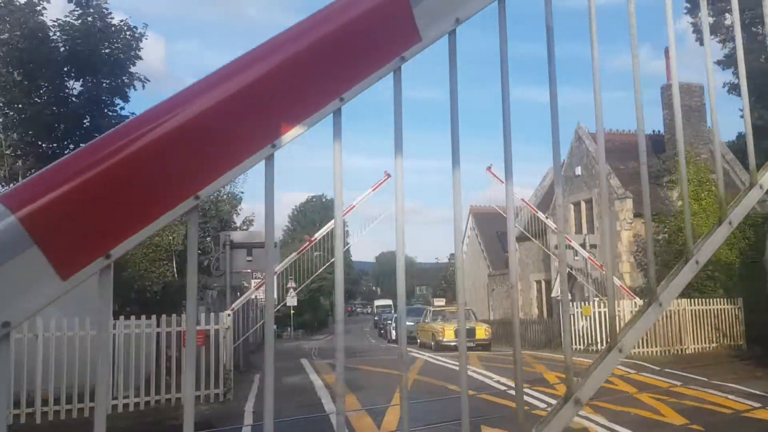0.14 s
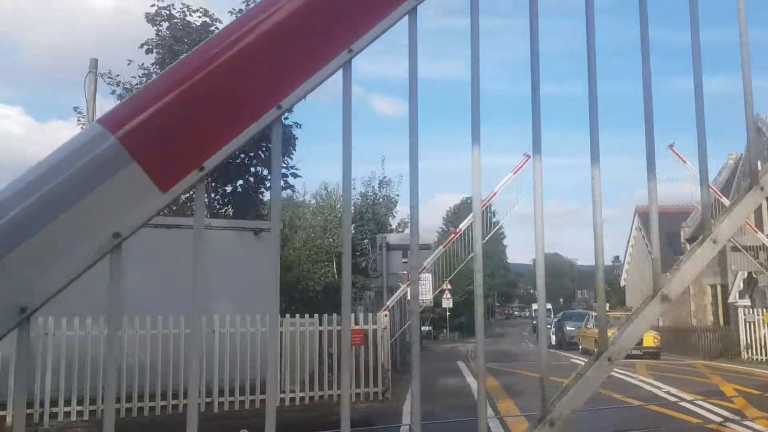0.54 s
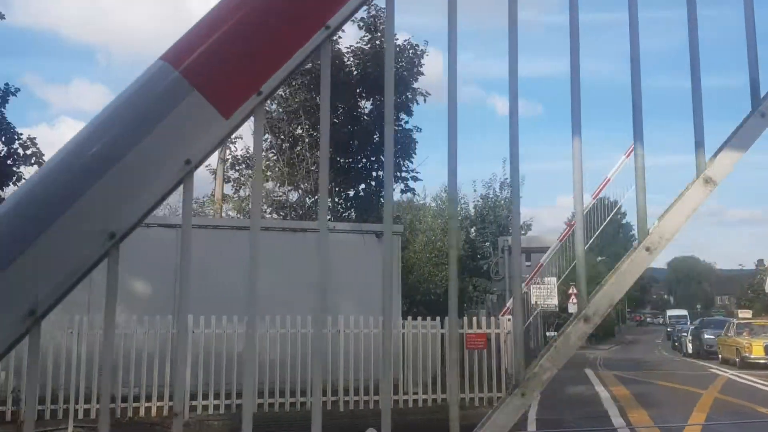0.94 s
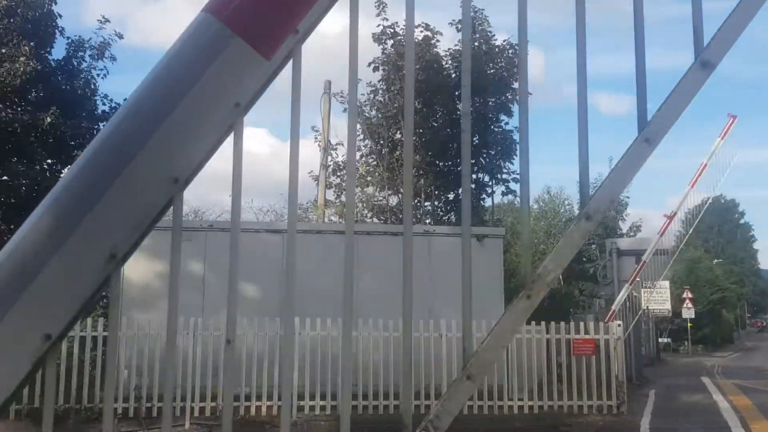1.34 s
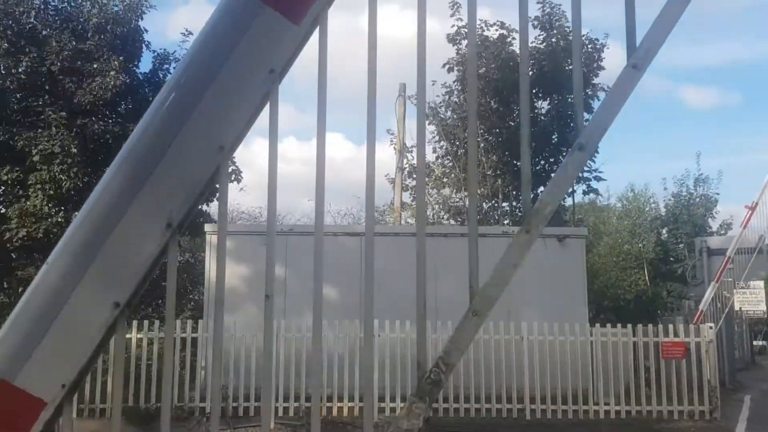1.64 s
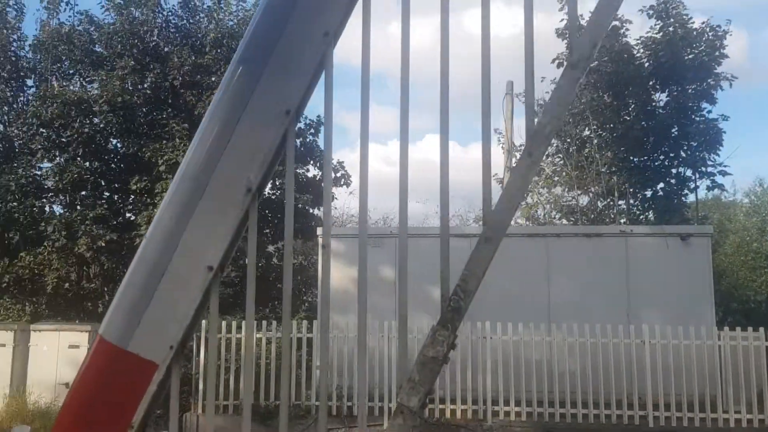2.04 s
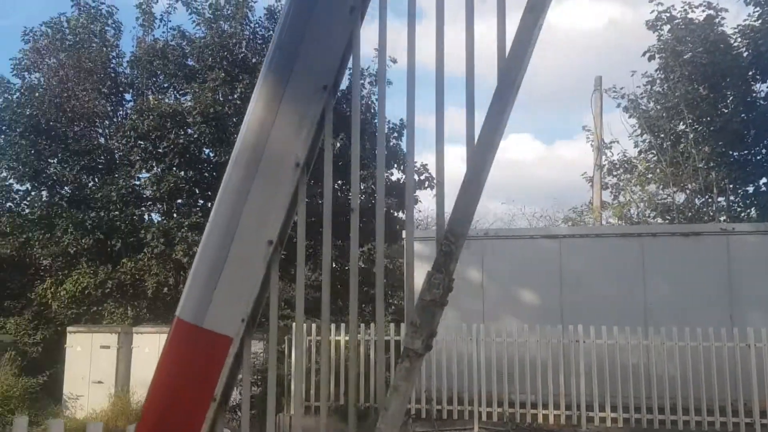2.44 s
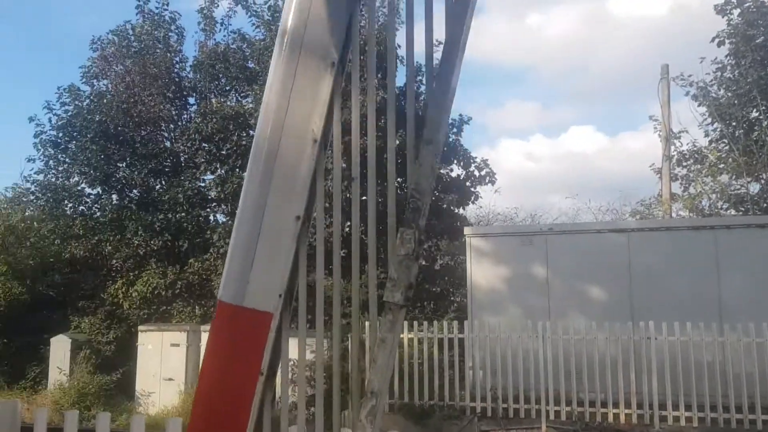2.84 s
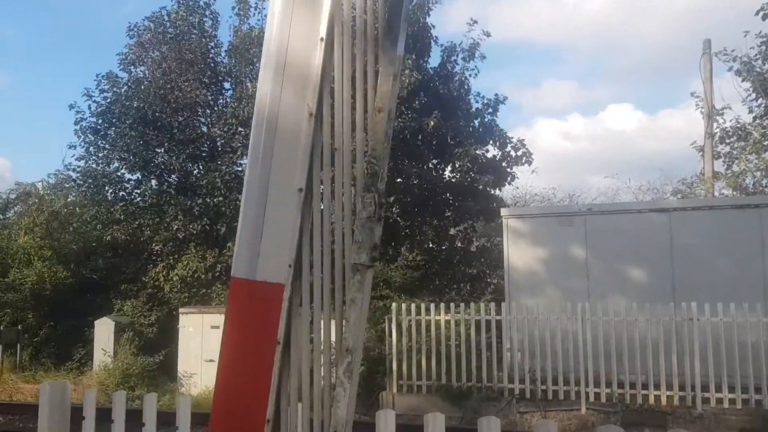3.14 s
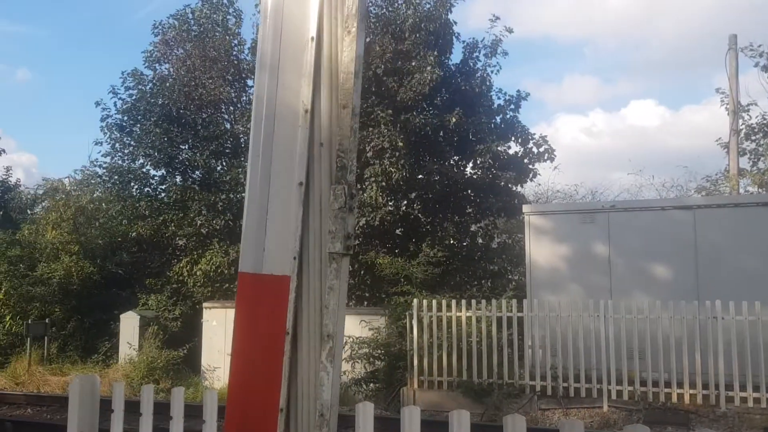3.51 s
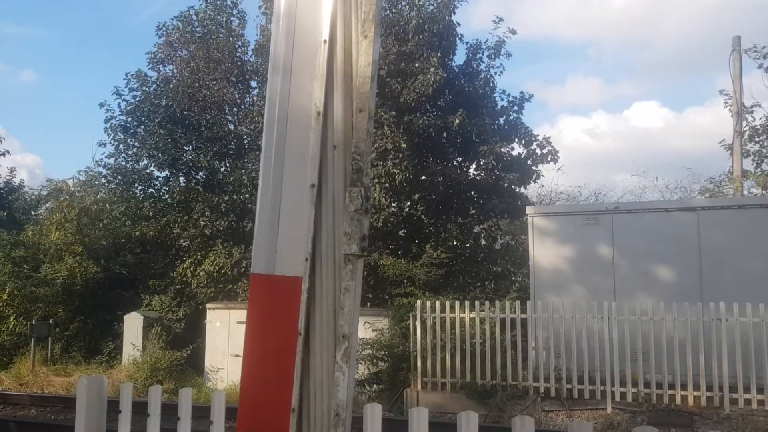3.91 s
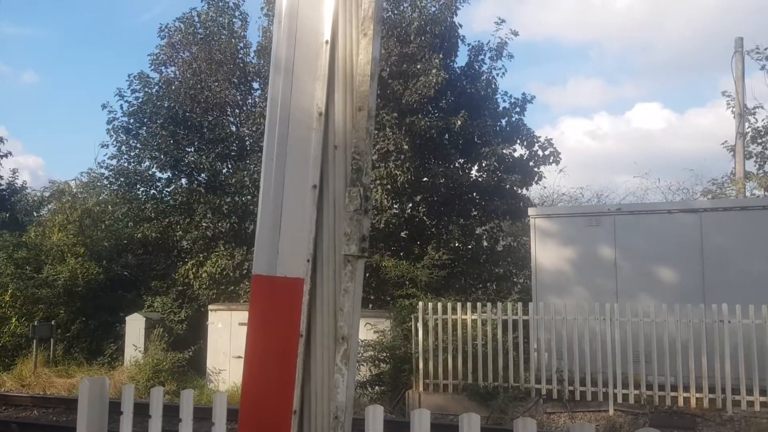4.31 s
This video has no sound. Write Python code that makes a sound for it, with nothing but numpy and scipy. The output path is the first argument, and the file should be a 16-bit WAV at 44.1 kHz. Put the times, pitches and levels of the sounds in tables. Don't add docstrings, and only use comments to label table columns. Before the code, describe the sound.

A level crossing barrier's pump hums steadily as the boom rises, then slams and clatters to a stop while cars pull away loudly.

```python
import sys
import numpy as np
from scipy import signal
from scipy.fft import rfft, irfft, next_fast_len
from scipy.io import wavfile
from scipy.ndimage import uniform_filter1d

SR = 44100
rng = np.random.default_rng(int(sys.argv[2]) if len(sys.argv) > 2 else 0)


def volts(x):
    e = np.asarray(x, float) / 20
    return 10 ** e


def to_wav(s):
    ch = np.atleast_2d(s).T
    pcm = np.round(np.clip(ch, -1, 1) * 32767)
    wavfile.write(sys.argv[1], SR, pcm.astype(np.int16))


N = 197068

# time_s, gain_db
ROAD_GAIN = [(0, 3), (.6, 0.5), (.85, 2.5), (1.4, 5.5), (1.9, 6), (2.6, 8.5), (3.0, 14), (3.25, 12),
             (3.42, 14.5), (3.55, 11), (3.75, 13.5), (4.47, 15.5)]
ROAD_LAYER_HZ = [45, 500, 4000, 12000]
# far_level_db, share_of_gain
ROAD_LAYERS = [
    (-54, 1.007),
    (-56.5, 0.92),
    (-73.5, 1.244),
    (-75.5, 0.39),
]
# freq_hz, level_db
ROAD_COLOUR = [(25, -9.5), (70, 0.5), (130, -4), (280, 1.5), (520, -10.5), (800, -1.5), (1050, -5.5),
               (1400, -6), (2100, 5), (3300, -0.5), (5200, -2), (7000, 2), (10000, -3), (14000, -1)]
# freq_hz, power_share
ROAD_COMMON = [(40, 0.9), (300, 0.72), (800, 0.67), (3000, 0.057), (12000, .2)]
# vane_rate_hz, sag_hz_per_s
FAR_PUMP_HZ = [(328.2, 2.6), (352, 2.85)]
# level_db, drift_db_per_s, last_swell_db, swell_s, swell_width_s
FAR_PUMPS = [(-46, -3.5, 11.5, 3.0, 0.25), (-55.5, 0, 16, 2.7, 0.5)]
# time_s, cycle_rate_hz, effort_db
CAR = [(0.0, 20.63, -53), (0.5, 20.76, -45), (1.0, 20.76, -41), (1.3, 20.65, -41.5), (1.46, 21.2, -40.5),
       (1.59, 24.84, -42), (1.69, 28.35, -40), (2.01, 29.62, -44), (2.2, 31.6, -44.5), (2.57, 35.51, -43),
       (2.8, 38.2, -57.5)]
# order, level_db re effort off resonance
CAR_ORDERS = [(4, -1), (6, -10.5), (8, -16.5), (10, -20), (14, -24)]
# order, level_db re effort
CAR_WEAK = [(2, -7.5), (3, -5.5), (5, -12.5), (9, -11)]
# freq_hz, width_hz, lift_db
CAR_PIPE = [(203.8, 28.3, 18.5), (294, 22, 8)]
# time_s, shaft_rate_hz, effort_db
VAN = [(1.9, 37.92, -46.5), (2.04, 37.4, -37.5), (2.23, 35.69, -40.5), (2.42, 35.54, -54),
       (2.49, 34.93, -37), (2.59, 35.69, -44.5), (2.7, 37.16, -32.5), (2.9, 40.92, -34.5),
       (3.06, 39.03, -34), (3.26, 36.23, -44), (3.6, 40.69, -34.5), (3.72, 41.52, -34.5),
       (3.8, 41.92, -25.5), (3.9, 43.95, -29), (3.97, 44.87, -28), (4.14, 48.76, -22), (4.26, 48.43, -25.5),
       (4.47, 50.05, -23)]
# order, level_db re order 2
VAN_ORDERS = [(3, -22.5), (4, -12), (6, -17)]
# order, level_db re order 2
VAN_WEAK = [(1, -38), (5, -23), (8, -18.5), (10, -35), (12, -35)]
# freq_hz, width_hz, lift_db
VAN_PIPE = [(112.4, 8.7, 15), (191, 15, 2.5)]
# start_s, end_s, reference_rate_hz, level_db
KNOCK = [
    (1.45, 3.048, 30.3, -53.5),
    (2.994, 4.479, 46, -45),
]
# freq_hz, width_hz, level_db
BLOCKS = [
    [(1060, 110, 2), (1670, 350, -1), (2080, 150, -1.5), (2720, 250, -2.5), (3280, 200, -2),
     (3810, 130, -3), (4470, 250, -6.5)],
    [(1060, 320, 7.5), (1647, 250, 7), (2240, 260, 3), (2630, 260, -7), (3300, 270, -4.5),
     (4400, 130, -13.5), (4850, 230, -46)],
]
# start_s, bright_db, body_db, t60_s, rise_s
RAILS = [(1.359, -54, -42, 0.1, 0.0042), (2.612, -50.5, -41.5, 0.14, 0.0054),
         (3.606, -39, -33, 0.18, 0.012), (3.65, -44.5, -46.5, .2, .006),
         (3.706, -45.5, -37.5, 0.18, 0.0045), (3.734, -58.5, -50, 0.13, 0.0049),
         (4.142, -37, -37, 0.15, 0.011), (4.221, -46, -48.5, .15, 0.0029), (4.229, -44, -51.5, .3, 0.0034),
         (4.336, -38.5, -43.5, 0.12, .01), (4.445, -41.5, -57, .05, .003)]
# time_s, rate_hz
PUMP_HZ = [(0, 359.6), (.5, 358.6), (1.3, 357.4), (1.6, 358), (2.0, 357.9), (2.85, 356.5), (3.1, 364.5),
           (3.3, 365)]
# time_s, level_db
PUMP_FIRST = [(0, -31), (.6, -32), (1.2, -32.5), (1.7, -29.5), (2.25, -33), (2.5, -36.5), (2.8, -37.5),
              (2.92, -36.5), (3.0, -29.5), (3.28, -29.5)]
# multiple, level_db re second
PUMP_UPPER = [(3, -28), (4, -23), (5, -26), (7, -31), (8, -24), (10, -32), (12, -33), (13, -32), (15, -35),
              (19, -34)]
# start_s, length_s, pitch_hz, level_db
SQUEAKS = [(0.045, 0.055, 2315, -54), (0.085, 0.054, 2240, -59.5), (0.176, 0.048, 2310, -53),
           (0.207, 0.043, 2250, -45), (2.894, 0.026, 2168, -40.5)]
# start_s, pitch_hz, level_db, t60_s
CLINKS = [(1.076, 4800, -50.5, .04), (2.2592, 6140, -33, .03), (2.26, 5340, -55, 0.083),
          (2.262, 1710, -45, 0.12), (2.616, 6450, -39, .05), (2.846, 1060, -32.5, 0.092),
          (3.297, 4400, -41, 0.06), (3.345, 2106, -25, 0.13), (3.346, 2270, -24, .12),
          (3.356, 5160, -45, 0.094), (3.359, 2104, -19, 0.056), (3.36, 2200, -29, 0.13),
          (3.359, 1300, -30, 0.093), (3.917, 2070, -31.5, 0.11), (3.923, 2210, -37, 0.076),
          (3.48, 1810, -34, 0.082), (3.617, 6200, -42, .06), (3.71, 4800, -38, 0.03),
          (3.734, 1770, -39, 0.1), (4.149, 5940, -35, 0.037)]
# start_s, bright_db, ring_db, t60_s, rise_s
BARS = [(1.075, -61, -55.5, 0.089, 0.0031), (2.2607, -40, -54, 0.058, 0.0013),
        (2.269, -51, -42.5, 0.09, 0.0034), (2.999, -62.5, -53, .1, 0.0043), (3.062, -50.5, -49, .1, 0.0071),
        (3.107, -49, -43.5, 0.16, 0.011), (3.229, -50.5, -53.5, 0.092, 0.0035),
        (3.294, -37, -48, 0.064, 0.00079), (3.343, -36, -27, 0.16, 0.0065),
        (3.3565, -26.5, -16.5, 0.077, 0.0012), (3.356, -33, -20, 0.11, .002),
        (3.378, -42.5, -32, 0.13, .003), (3.42, -52, -42.5, 0.066, 0.0069),
        (3.474, -56.5, -32, 0.078, .002), (3.88, -54.5, -42.5, .08, 0.0025),
        (3.897, -44.5, -43.5, 0.12, 0.0042), (3.915, -47.5, -29, 0.08, 0.011),
        (3.931, -39, -48.5, 0.071, 0.002)]
# freq_hz, width_hz, level_db
BAR_MODES = [(1270, 40, -5), (1490, 40, -8), (1816, 30, -2), (2106, 30, 2), (2202, 30, 1), (2456, 40, -4),
             (2790, 150, -11), (3150, 200, -10), (2000, 1500, -13), (4200, 600, -11), (5100, 700, -11)]
# start_s, level_db, t60_s, rise_s
STOP = [
    (3.341, -23.5, 0.13, 0.0037),
    (3.354, -20, 0.22, 0.0027),
    (3.375, -25.5, 0.2, 0.0033),
    (3.41, -32.5, 0.38, 0.0046),
]
# freq_hz, width_hz, level_db
CABINET = [(286, 26, 8.5), (350, 27, -1), (385, 11, 6.5), (411, 16, 10), (481, 8.2, 8), (600, 69, -4.5),
           (796, 28, -5), (870, 25, -8.5), (1296, 490, -11)]
# start_s, level_db, t60_s, rise_s
VALVE = [
    (3.282, -18.5, 0.079, 0.0056),
    (3.293, -25, 0.18, .003),
]
# freq_hz, width_hz, level_db
VALVE_MODES = [(408, 19, 11.5), (507, 41, 5), (610, 66, 1.5), (745, 32, 2.5), (1140, 420, -6.5),
               (2360, 2700, -28.5)]
# freq_hz, gain_db
MICROPHONE = [(20, -18), (45, 1.5), (5300, 0), (6300, -7), (7100, -9.5), (8600, -17), (9600, -8.5),
              (10500, -4.5), (12500, 0.5), (15300, -0.5)]

BARRIER_LAG, ROAD_LAG = -3, 16


def level(x):
    return x / np.sqrt(np.mean(x ** 2))


def noise():
    return rng.standard_normal(N)


def curves(table):
    s, *columns = np.transpose(table)
    t = np.arange(N) / SR
    fade_in = t - s[0] + .03 * (s[0] == 0)
    gate = np.clip(np.minimum(fade_in, s[-1] + .02 - t) / .03, 0, 1)
    return [np.interp(t, s, c) for c in columns], gate


def along(table, hz):
    points = np.array(table)
    return np.interp(np.log(hz), np.log(points[:, 0]), points[:, 1])


def bump(s, width_s):
    return np.exp(-((np.arange(N) / SR - s) / width_s) ** 2)


def walk(rate_hz):
    k = int(SR / rate_hz)
    held = np.repeat(rng.standard_normal(N // k + 1).astype(np.float32), k)
    return 1.072 * uniform_filter1d(uniform_filter1d(held, k), k)[:N]


def band(x, hz, width_hz):
    return signal.lfilter(*signal.iirpeak(hz, hz / width_hz, fs=SR), x)


def double_band(x, hz, width_hz):
    return level(band(band(x, hz, width_hz), hz, width_hz))


def body(x, modes):
    gain = np.sqrt(sum(volts(2 * db) * width for _, width, db in modes) * np.pi / SR)
    ringing = sum((-1) ** k * volts(db) * band(x, hz, width) for k, (hz, width, db) in enumerate(modes))
    return ringing / gain


def ports(x, lag, pan_db):
    lag = round(lag)
    left = np.roll(x, max(lag, 0)) * volts(pan_db / 2)
    right = np.roll(x, max(-lag, 0)) * volts(-pan_db / 2)
    return np.array([left, right])


def tilt(db):
    return volts(np.array([[db], [-db]]))


def stack(hz, orders, wobble, flutter_db, rate_hz):
    turn = 2 * np.pi * np.cumsum(hz * (1 + wobble * walk(rate_hz))) / SR
    out = np.zeros(N)
    for k, db in orders:
        gain = np.sqrt(2) * volts(db + flutter_db * walk(rate_hz))
        out += gain * np.sin(k * turn + rng.uniform(0, 2 * np.pi))
    return out


def bursts(times, dbs, t60s, rises, grain_db):
    power = np.zeros(N)
    for s, db, t60, rise in zip(times, dbs, t60s, rises):
        start, t60 = int(s * SR), max(t60, .01)
        t = np.arange(min(N - start, int((abs(rise) + t60) * SR))) / SR
        swell = np.clip(t / max(rise, 1e-4), 0, 1) ** 2
        power[start:start + len(t)] += volts(2 * db) * swell * volts(-120 * np.maximum(t - rise, 0) / t60)
    return np.sqrt(power) * level(noise() * volts(grain_db * walk(700)))


def crack(s, db, t60, rise):
    shower = [bursts(s, db, .6 * t60, rise, grain_db=4.5) for _ in range(3)]
    treble = signal.butter(2, [4000, 14000], "band", fs=SR, output="sos")
    return signal.sosfilt(treble, shower)


def road():
    (near_db,), _ = curves(ROAD_GAIN)
    dbs = [far_db + share * near_db for far_db, share in ROAD_LAYERS]
    out, swell = np.zeros((2, N)), walk(3.014)
    for hz in 25 * 2 ** np.arange(0, 9.4, 1 / 3):
        place = np.interp(np.log(hz), np.log(ROAD_LAYER_HZ), np.arange(4))
        low = min(int(place), 2)
        db = dbs[low] + (place - low) * (dbs[low + 1] - dbs[low])
        db = db + along(ROAD_COLOUR, hz) + 2.0 * swell + 1.6 * walk(9)
        share = np.clip(along(ROAD_COMMON, hz), 0, 1)
        common = level(band(noise(), hz, hz / 4))
        apart = np.array([np.roll(common, N // 3), np.roll(common, -N // 3)])
        together = ports(common, ROAD_LAG if hz > 900 else 4, 0)
        pair = np.sqrt(share) * together + np.sqrt(1 - share) * apart
        out += volts(db) * pair * tilt(.4)
    return out


def far_pumps():
    stop_s = 3.3
    (t,), gate = curves([(0, 0), (stop_s, stop_s)])
    out = np.zeros((2, N))
    for (hz, sag), (db, drift, swell_db, s, width) in zip(FAR_PUMP_HZ, FAR_PUMPS):
        db = db + drift * t + swell_db * bump(s, width)
        tone = stack(hz - sag * t, [(1, db), (2, db - 10.5)], wobble=0.00033, flutter_db=2.0, rate_hz=15)
        out += ports(gate * tone, 11, 0.54)
    return out


def pipe_orders(orders, hz, effort_db, pipe):
    lifted = []
    for k, db in orders:
        lift = sum(lift_db * np.exp(-((k * hz - at_hz) / width) ** 2) for at_hz, width, lift_db in pipe)
        lifted.append((k, effort_db + db + lift))
    return lifted


def knock(rate_hz, firings, row, block, scatter_db):
    start, end, at_hz, db = row
    _, gate = curves([(start, 0), (end, 0)])
    db = db + 14.5 * np.log2(rate_hz / at_hz)
    db = db + 1.5 * walk(14) + 5.5 * bump(1.93, 0.29)
    firing = np.cumsum(firings * rate_hz / SR)
    strength = volts(scatter_db * np.clip(rng.standard_normal(700), -3, 1.5))[firing.astype(int)]
    blows = strength * np.exp(-(firing % 1) / 0.44) * noise()
    ringing = np.zeros(N)
    for hz, width, panel_db in block:
        ringing += volts(panel_db + 2.2 * walk(15)) * double_band(blows, hz, width)
    return gate * volts(db + 3.0) * level(ringing)


def first_car():
    (hz, effort_db), gate = curves(CAR)
    orders = pipe_orders(CAR_ORDERS, hz, effort_db, CAR_PIPE)
    orders += [(k, effort_db + db) for k, db in CAR_WEAK]
    exhaust = gate * stack(hz, orders, wobble=.006, flutter_db=2.5, rate_hz=12)
    knocks = knock(hz, 4, KNOCK[0], BLOCKS[0], scatter_db=3.8)
    return ports(exhaust, 7, .9) + ports(knocks, ROAD_LAG, -1.3)


def second_car():
    (hz, effort_db), gate = curves(VAN)
    orders = [(2, effort_db)]
    orders += [(k, db + 3.9 * walk(14)) for k, db in pipe_orders(VAN_ORDERS, hz, effort_db, VAN_PIPE)]
    orders += [(k, effort_db + db) for k, db in VAN_WEAK]
    exhaust = gate * stack(hz, orders, wobble=0.0063, flutter_db=2.0, rate_hz=15)
    rush_gain = volts(-39 + 1.9 * walk(12)) * bump(3.94, 0.89)
    rush = rush_gain * double_band(noise(), 233, 250)
    knocks = knock(hz, 2, KNOCK[1], BLOCKS[1], scatter_db=2)
    return ports(exhaust + rush, 7, 1.0) + ports(knocks, ROAD_LAG, -1.3)


def rails():
    s, bright_db, body_db, t60, rise = np.transpose(RAILS)
    common, left, right = crack(s, bright_db, t60, rise)
    modes = [(2100, 480, 5.0), (4420, 1100, -2.5), (1100, 610, -1.5)]  # freq_hz, width_hz, level_db
    slap = body(bursts(s, body_db, 0.97 * t60, rise, grain_db=0.0), modes)
    return ports(slap + common, ROAD_LAG, -.4) + 1.2 * np.array([left, right]) * tilt(1.1)


def near_pump():
    (hz,), _ = curves(PUMP_HZ)
    (first_db,), gate = curves(PUMP_FIRST)
    second_db = -44.5 + 2.5 * bump(1.5, 0.81) + 2 * walk(6)
    orders = [(1, first_db), (2, second_db)] + [(k, second_db + db) for k, db in PUMP_UPPER]
    ripple = stack(hz, orders, wobble=0.0008, flutter_db=0.55, rate_hz=25)
    whistle = volts(-51 + 2.6 * walk(25.13)) * level(band(noise(), 1059, 57))
    flow = volts(-52.5 + 6.5 * bump(2.1, .8)) * double_band(noise(), 760, 230)
    return ports(gate * ripple, 3.7, 1.4) + ports(gate * (whistle + flow), -9.0, .4)


def squeaks():
    out = np.zeros(N)
    for s, length, hz, db in SQUEAKS:
        start = int(s * SR)
        t = np.arange(int(length * SR)) / SR
        gain = volts(db + 3.5 + 3.4 * walk(300)[:len(t)]) * np.sin(np.pi * t / length) ** 0.89
        out[start:start + len(t)] += gain * np.sin(2 * np.pi * hz * t)
    return ports(out, ROAD_LAG, -1.1)


def clinks():
    out = np.zeros(N)
    t = np.arange(int(.15 * SR)) / SR
    for s, hz, db, t60 in CLINKS:
        start = int(s * SR)
        gain = volts(db - 60 * t / t60) * np.minimum(t / 0.00053, 1)
        out[start:start + len(t)] += gain * np.sin(2 * np.pi * hz * t)
    return ports(out, -1, -.3)


def chatter(count=24):
    from_s = 3.8
    span_s = N / SR - .01 - from_s
    return [(from_s + span_s * u, -55 - 8 * v, -50 - 8 * v, 0.055, .003) for u, v in rng.random((count, 2))]


def barrier():
    s, bright_db, ring_db, t60, rise = np.transpose(BARS + chatter())
    common, left, right = crack(s, bright_db, t60, rise)
    ring = body(bursts(s, ring_db, .8 * t60, rise, grain_db=4), BAR_MODES)
    thump = body(bursts(*np.transpose(STOP), grain_db=-0.5), CABINET)
    thump += body(bursts(*np.transpose(VALVE), grain_db=-0.5), VALVE_MODES)
    near = ports(ring + thump, BARRIER_LAG, -.3) + ports(1.6 * common, -1, 1.2)
    near += 1.8 * np.array([left, right]) * tilt(.6)
    t = np.arange(int(.3 * SR)) / SR
    tail = rng.standard_normal((2, len(t))) * volts(-60 * t / 0.54) * (t > .008)
    return near + volts(-43.5) * signal.fftconvolve(near, tail, axes=1)[:, :N]


def scene():
    traffic = road() + first_car() + second_car() + rails()
    machine = near_pump() + squeaks() + clinks() + barrier()
    return far_pumps() + traffic + machine


def low_pass(x):
    return signal.sosfilt(signal.butter(12, 15730, fs=SR, output="sos"), x)


def record(dry):
    size = next_fast_len(N + 4096)
    gain = volts(along(MICROPHONE, np.arange(1, size // 2 + 2) * SR / size))
    gain[int(15800 * size / SR):] = 0
    mix = irfft(rfft(dry, size) * gain, size)[:, :N]
    return low_pass(mix)


dry = scene()
out = record(dry)
to_wav(out)
```